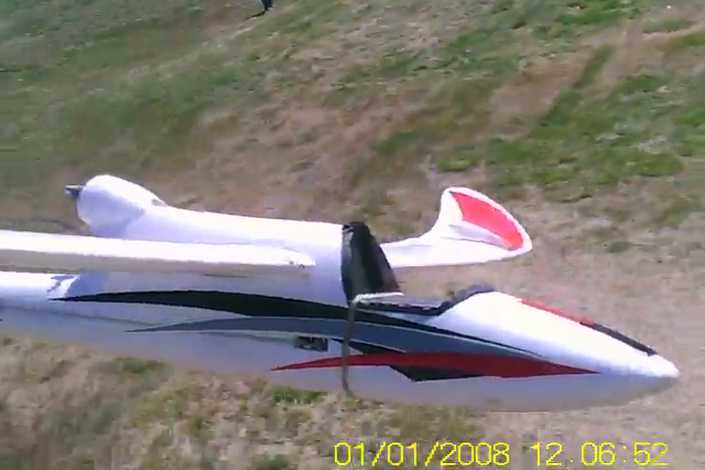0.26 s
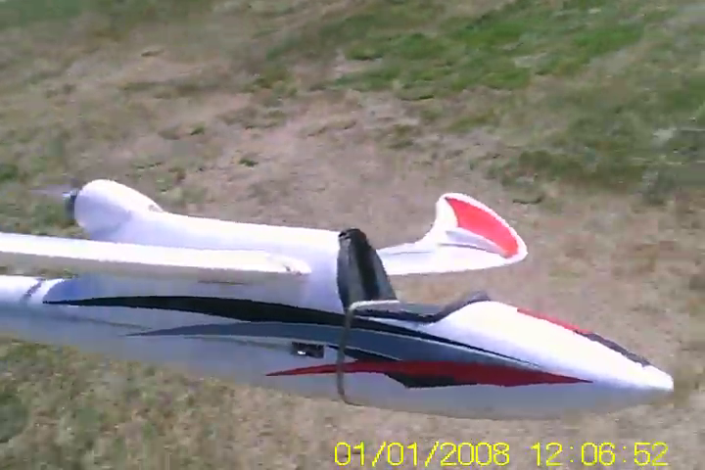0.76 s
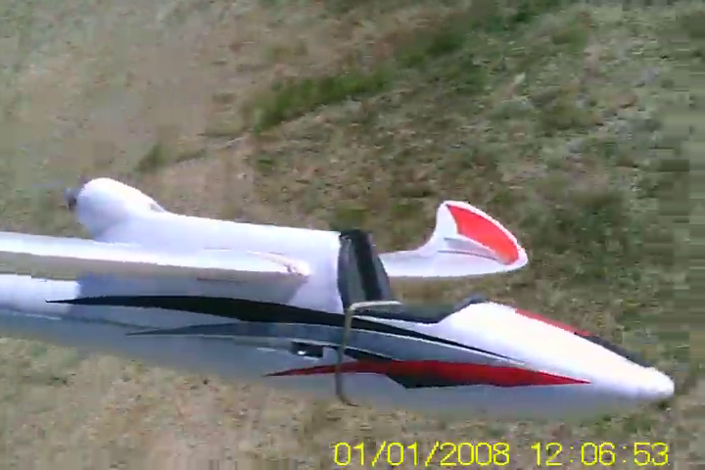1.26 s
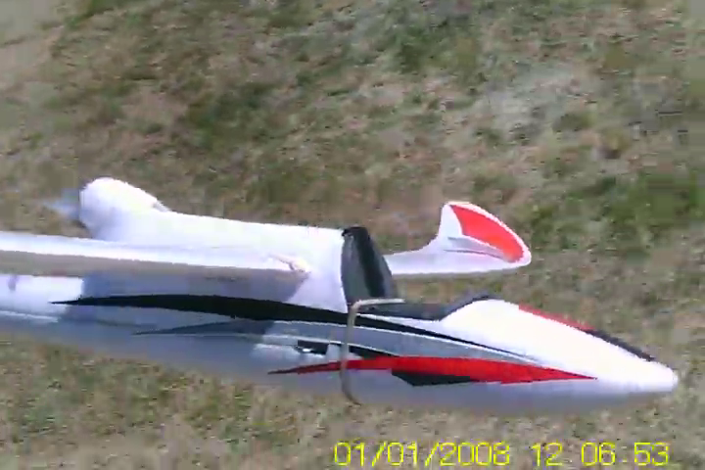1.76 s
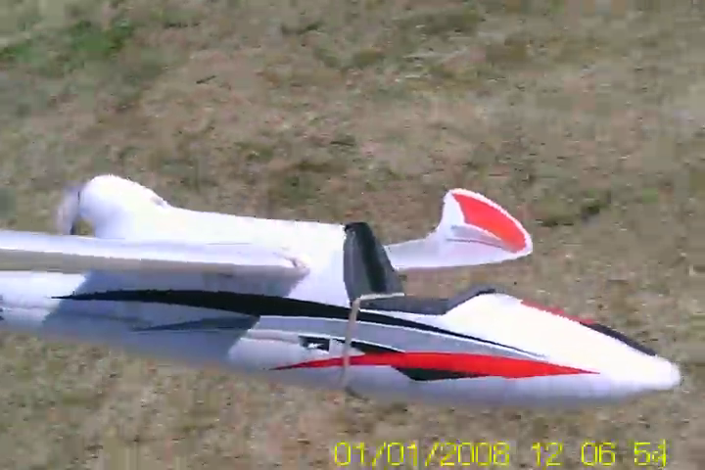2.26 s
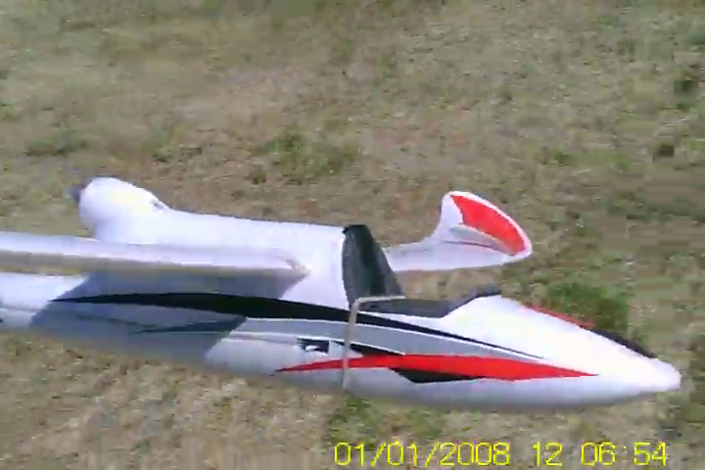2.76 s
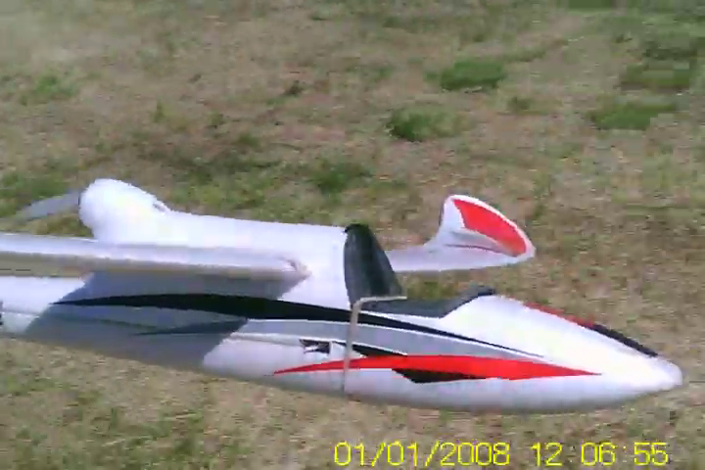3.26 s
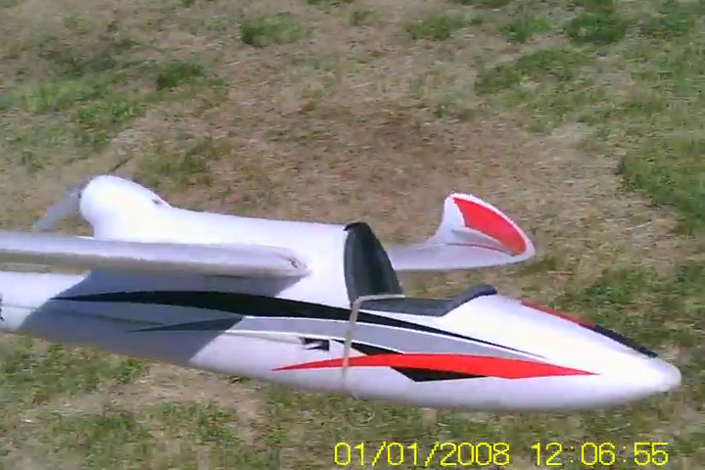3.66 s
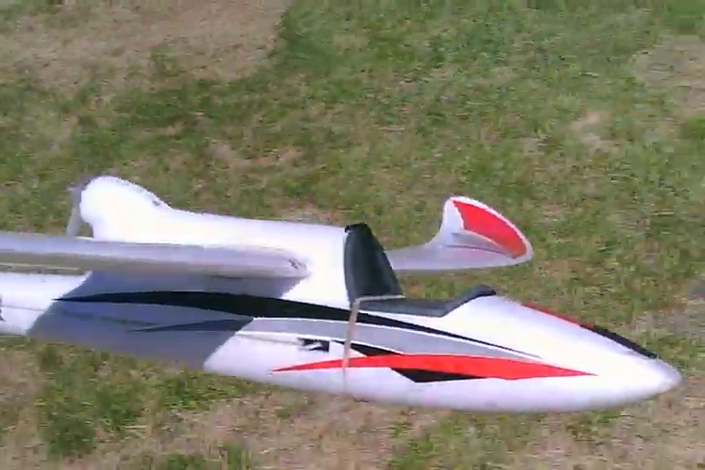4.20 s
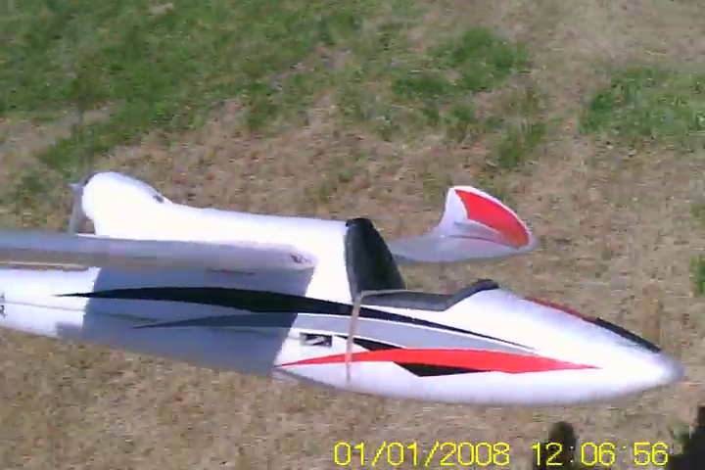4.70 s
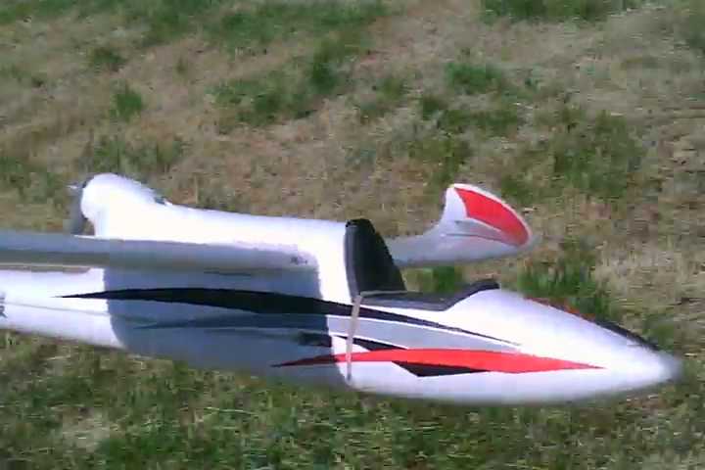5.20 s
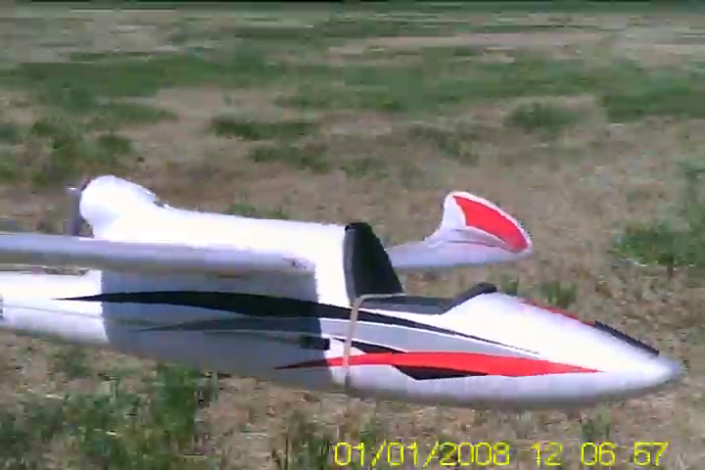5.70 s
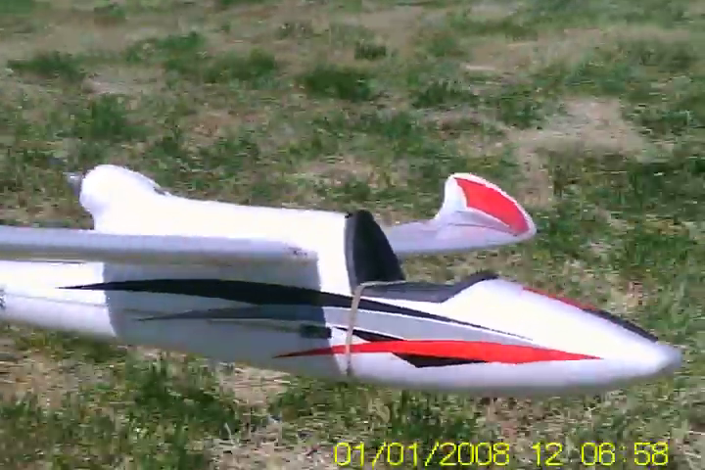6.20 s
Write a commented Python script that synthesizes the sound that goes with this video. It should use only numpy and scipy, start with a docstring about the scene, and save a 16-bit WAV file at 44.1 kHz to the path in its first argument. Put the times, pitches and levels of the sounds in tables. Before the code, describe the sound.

A model plane's electric motor whines close to an onboard microphone, half buried in low, gusty wind noise, while the mount buzzes and clicks. A single sharp, low thump comes early. Soon the motor winds down in a long falling whine, leaving fluttering air and a light crackle during the glide, until it spins up again with a short rasp.

```python
"""Turbulent air buffets the microphone of a small camera on the wing of a foam model plane, low over a field.
The electric pusher motor whines by magnetic cogging, and its unbalance rattles the mount once a turn.
One hard gust thumps the wing. The throttle closes, the whine falls through the airframe's resonances,
the plane glides with a faint dry crackle, and the motor starts again with a rasp."""
import sys
import numpy as np
from scipy import signal
from scipy.fft import rfft, irfft, next_fast_len
from scipy.io import wavfile
from scipy.ndimage import uniform_filter1d, map_coordinates

SR = 44100
rng = np.random.default_rng(int(sys.argv[2]) if len(sys.argv) > 2 else 0)


def inscribe(sig):
    """Save sig as 16-bit PCM at rate SR to the path in sys.argv[1].

    A 1-D sig is mono; a 2-D sig holds one channel per row.
    Samples are clipped to [-1, 1] before scaling.
    """
    pcm = np.round(np.clip(np.atleast_2d(sig).T, -1, 1) * 32767)
    wavfile.write(sys.argv[1], SR, pcm.astype(np.int16))


N = 284445

# bursts of buzzing: mostly camera vibration on the mount, but the 1.92-2.2 s row is the speed controller's
# freewheeling hiss as the motor winds down: (start [s], end [s], tap level [dB], fizz level [dB])
BURSTS = [(.08, .155, -70, -48.5), (0.201, 0.31, -57, -46), (0.328, 0.465, -52.5, -46),
          (0.472, .57, -50, -45), (.585, .64, -67, -52.5), (0.637, .775, -51, -47.5),
          (.8, 0.842, -66, -50.5), (0.877, 0.983, -62, -54), (0.998, 1.07, -59, -55),
          (1.16, 1.223, -62, -63), (1.28, 1.444, -62, -51.5), (1.488, 1.607, -64, -53),
          (1.664, 1.75, -61, -55), (1.92, 2.2, -78, -54), (6.365, 6.4, -66, -57)]
# the motor's run-up after the glide: (time [s], shaft speed [turns/s])
RESTART = [(6.21, 8), (6.223, 22), (6.255, 53), (6.315, 87.5), (6.34, 108), (6.38, 149.5), (6.4, 165),
           (6.45, 186)]


def amp(db):
    """Amplitude ratio of a level in decibels."""
    return 10 ** (np.asarray(db) / 20)


def unit(x):
    """Normalisation to rms 1."""
    return x / np.sqrt(np.mean(x ** 2) + 1e-20)


def curves(rows):
    """Linear interpolation in time: one value per sample for each column after the first."""
    times, *columns = np.transpose(rows)
    return [np.interp(np.arange(N) / SR, times, column) for column in columns]


def wobble(rate):
    """Smooth random modulation: a spline through `rate` Gaussian knots a second."""
    knots = rng.standard_normal(int(N * rate / SR) + 4)
    return map_coordinates(knots, [np.arange(N) * rate / SR])


def swells(rows):
    """Superposed Gaussian envelopes from (time [s], half-width [s], height) rows."""
    t = np.arange(N) / SR
    return sum(height * np.exp(-((t - at) / width) ** 2) for at, width, height in rows)


def gate(start, end, ramp_s=0.019):
    """A trapezoidal window, open from start to end."""
    t = np.arange(N) / SR
    return np.clip(np.minimum(t - start, end - t) / ramp_s + .5, 0, 1)


def filtered(x, response):
    """Linear filtering: the spectrum of x times a frequency response."""
    size = next_fast_len(N + SR // 2)
    return irfft(rfft(x, size) * response(np.fft.rfftfreq(size, 1 / SR)), size)[:N]


def coloured(x, spectrum):
    """Spectral shaping by (frequency [Hz], gain [dB]) points on a log axis, at rms 1."""
    points_hz, db = np.transpose(spectrum)
    return unit(filtered(x, lambda hz: amp(np.interp(np.log(hz + 1), np.log(points_hz), db))))


def noise(spectrum):
    """Gaussian noise of rms 1 with the given spectral shape."""
    return coloured(rng.standard_normal(N), spectrum)


def ring(blows, modes):
    """Modal response: blows convolved with a sum of damped sinusoids of peak 1."""
    t = np.arange(SR // 20) / SR
    response = sum(amp(db - 60 * t / t60) * np.sin(2 * np.pi * hz * t) for hz, db, t60 in modes)
    return signal.fftconvolve(blows, response / np.abs(response).max())[:N]


def shaft_speed():
    """Turns per second: cruise, a coast under quadratic drag and friction to windmilling, then restart."""
    # cruise and the closing of the throttle: (time [s], shaft speed [turns/s])
    cruise = [(0, 164), (.05, 188), (.12, 198), (.35, 209), (.7, 213), (1.3, 197.8), (1.74, 198),
              (1.9, 175), (2.05, 108), (2.17, 78)]
    coast_start_s, braking_per_s = 2.3, .6
    coast_speed, knee_speed, windmill_speed = 60.3, 32, 8  # turns/s; drag equals friction at the knee
    times = np.linspace(coast_start_s, RESTART[0][0], num=200, endpoint=False)
    slowing = np.arctan(coast_speed / knee_speed) - braking_per_s * (times - coast_start_s)
    coast = np.maximum(knee_speed * np.tan(slowing), windmill_speed)
    return curves(np.vstack([cruise, np.column_stack([times, coast]), RESTART]))[0]


def wind(speed, turns):
    """Turbulent pressure at the microphone port: noise bands modulated by eddies and shaft rotation."""
    # airflow, easing into the glide: (time [s], buffet level [dB], rush level [dB], hiss level [dB])
    airflow = [(0, -22.5, -35, -49.5), (.25, -19.5, -31.5, -41), (.52, -18.5, -28, -35),
               (.765, -18.5, -30, -40.5), (.79, -18, -39, -47), (.92, -25, -32.5, -41.5),
               (1.15, -23.5, -37.5, -45), (1.4, -25, -34, -42), (1.8, -24.5, -34.5, -44),
               (2.02, -24.5, -32.5, -41), (2.3, -23.5, -36, -46), (2.7, -23, -35.5, -50.5),
               (3.28, -22.5, -38, -53), (3.65, -26.5, -40.5, -55.5), (4.4, -24.5, -39.5, -57.5),
               (4.88, -26, -40.5, -58.5), (6.15, -23.5, -40.5, -64.5), (6.45, -28.5, -39.5, -46)]
    # four bands of the airflow, low to high: (frequency [Hz], relative spectral density [dB])
    buffet_spectrum = [(8, -3), (25, 0.5), (55, 0), (100, -3.5), (170, -9.5), (280, -15.5), (450, -21.5),
                       (900, -33.5), (2000, -70.5)]
    rush_spectrum = [(150, -28), (350, 4.5), (550, 2), (900, 0), (1300, -1), (1700, -1), (2050, -4),
                     (2350, -16), (2900, -26.5), (5000, -60)]
    hiss_spectrum = [(900, -5), (1700, 1.5), (2450, 6.5), (2800, 0.5), (3200, -0.5), (3700, -5),
                     (4200, -6.5), (4600, -4), (5200, -17.5), (7000, -35), (10000, -38)]
    fizz_spectrum = [(3000, -3), (5000, -3), (5900, -1.5), (6600, -4), (7200, -3), (7800, -12),
                     (8600, -25.5), (9700, -10), (10400, -18.5), (11600, -21.5)]
    # brief gusts that brighten the airflow: (time [s], half-width [s], rise of the hiss [dB])
    gusts = [(2.7, 0.047, 5.5), (3.81, .035, 7), (3.92, .02, 6), (4.03, 0.06, 9), (4.595, 0.014, 9.5),
             (4.71, 0.069, 6), (5.25, 0.016, 2), (5.77, 0.022, 7.5)]
    # large eddies that thump the port: (time [s], half-width [s], level [dB])
    large_eddies = [(.75, 0.039, -18.5), (2.25, .12, -29.5), (2.72, 0.063, -30), (3.271, 0.056, -29.5),
                    (4.519, 0.045, -34.5), (5.24, 0.047, -28.5), (6.12, 0.076, -30.5)]
    # their spectrum: (frequency [Hz], relative spectral density [dB])
    thump_spectrum = [(20, -5), (60, 3), (170, 2.5), (300, -6.5), (450, -10.5), (900, -51), (3000, -120)]
    buffet_db, rush_db, hiss_db = curves(airflow)
    gust_db = swells(gusts)
    eddies, flutter = wobble(28), wobble(170)
    relative_speed = speed / speed.max()
    chop = relative_speed * np.cos(2 * np.pi * turns)  # the treble is chopped once a turn
    puffs = amp(db=6 * chop)
    puffs /= np.sqrt(uniform_filter1d(puffs ** 2, size=SR // 25))  # bunches the power without adding any
    # fizz from the airstream, the propeller wash, the buzzing mount and the controller's freewheeling hiss adds
    # in power
    stream = amp(-73 + 0.45 * (hiss_db - hiss_db.mean()) + gust_db)
    wash = amp(-58) * np.maximum(gate(start=0, end=2.22), relative_speed ** 2)
    buzz = sum(amp(db) * gate(start, end) for start, end, _, db in BURSTS)
    fizz_level = np.sqrt(stream ** 2 + wash ** 2 + buzz ** 2)
    buffet = amp(buffet_db) * noise(buffet_spectrum)
    rush = amp(rush_db + 0.53 * gust_db) * unit(noise(rush_spectrum) * amp(0.6 * eddies + 0.92 * flutter))
    hiss_flicker = amp(0.98 * eddies + 1.2 * flutter + 0.89 * chop)
    hiss = amp(hiss_db + gust_db) * unit(noise(hiss_spectrum) * hiss_flicker)
    fizz = fizz_level * unit(noise(fizz_spectrum) * amp(0.46 * eddies + 1.5 * flutter) * puffs)
    thumps = swells([(at, width, amp(db)) for at, width, db in large_eddies]) * noise(thump_spectrum)
    return buffet + thumps + rush + hiss + fizz


def airframe(hz):
    """Transfer gain of the airframe: resonances summed in power, notched by one antiresonance."""
    # structural resonances: (frequency [Hz], bandwidth [Hz], peak gain [dB])
    resonances = [(590, 70, -15), (712, 45, -6), (970, 70, -7), (1050, 80, 3.5), (1310, 150, -5.5),
                  (1650, 80, -6), (1950, 90, -14), (2110, 110, -11), (2280, 90, -17), (2560, 160, -18),
                  (2980, 250, -23), (4650, 700, -16), (7100, 900, -29)]
    notch_hz, notch_half_width_hz, notch_db = 1135, 49, -13
    notch = amp(notch_db * np.exp(-((hz - notch_hz) / notch_half_width_hz) ** 2))
    power = sum(amp(db) ** 2 / (1 + (2 * (hz - centre) / width) ** 2) for centre, width, db in resonances)
    return notch * np.sqrt(power)


def motor(speed, turns):
    """Forced vibration: cogging tones flare at airframe resonances; propeller tones grow as speed cubed."""
    # how hard the cogging shakes the pylon: (shaft speed [turns/s], level [dB])
    drive = [(8, -70), (13, -38), (19, -26.5), (58, -26.5), (68, -34), (95, -33), (125, -30), (150, -38),
             (185, -36), (210, -41)]
    # cogging of nine slots against twelve magnets: (order [cycles/turn], relative level [dB])
    cogging = [(27, -8), (36, 0), (72, -9), (81, -6), (99, -10), (108, -4.5), (110, -7)]
    # propeller and unbalance tones: (order [cycles/turn], level at full speed [dB])
    propeller = [(2, -42), (4, -51), (9, -51.5), (10, -48), (11, -55), (12, -58)]
    slots, bell_hz, full_load_acceleration = 9, 2400, 300  # acceleration in turns/s^2
    load = np.clip(np.gradient(speed) * SR / full_load_acceleration, 0, 1)
    load_db = load * (.7 + 3 * wobble(200))  # under load the whine grows and turns ragged
    whine_db = np.interp(speed, *np.transpose(drive)) + load_db
    eccentricity = 1 + 0.31 * np.sin(2 * np.pi * turns)  # the rotor is slightly off centre
    angle = turns + 0.00047 * wobble(66)  # uneven rotation roughens the overtones most
    tones = amp(-38) * load * airframe(slots * speed) * np.sin(2 * np.pi * slots * angle)
    for order, db in cogging:
        hz = order * speed
        is_overtone = order > 36
        flutter_db = 4 if is_overtone else 2.2
        # overtones carry only near the ring of the motor bell
        bell = 1 / (1 + is_overtone * (np.log(hz / bell_hz) / .3) ** 4)
        level = amp(whine_db + db + flutter_db * wobble(30)) * eccentricity * airframe(hz) * bell
        tones += level * np.sin(2 * np.pi * order * angle)
    for order, db in propeller:
        level = amp(db + 2.2 * wobble(8)) * (speed / speed.max()) ** 3
        tones += level * np.sin(2 * np.pi * order * turns + 0.45 * wobble(22))
    return tones


def controller(turns):
    """The speed controller whistles at its switching rate; its start-up kicks excite the pylon's modes."""
    # switching whistle: (time [s], level [dB])
    whistle_levels = [(0, -57), (.8, -66), (1.88, -65), (1.96, -110), (6.13, -110), (6.165, -68),
                      (6.23, -62), (6.45, -56.5)]
    # modes of the motor pylon: (frequency [Hz], relative level [dB], 60 dB decay time [s])
    pylon_modes = [(1000, -7, 0.024), (1620, -5, 0.019), (2330, -3.5, 0.015), (4700, -10, .012)]
    # surges of rasp as the motor pulls up: (time [s], half-width [s], level [dB])
    surges = [(6.235, 0.02, -39), (6.28, 0.027, -40), (6.39, .012, -52), (6.44, 0.028, -43.5)]
    switching_hz, kicks_per_turn, cutoff_hz = 8011, 12, 5600
    t = np.arange(N) / SR
    whistle = amp(curves(whistle_levels)[0] + .6 * wobble(37)) * np.sin(2 * np.pi * switching_hz * t)
    kicks = np.diff(np.floor(kicks_per_turn * turns), prepend=0) * rng.standard_normal(N)
    strain = swells([(at, width, amp(db)) for at, width, db in surges])
    # the soft mount dulls the kicks
    rasp = filtered(ring(kicks, pylon_modes), lambda hz: 1 / (1 + (hz / cutoff_hz) ** 12))
    return whistle + strain * rasp / rasp[t > RESTART[0][0]].std()


def mount_rattle(turns):
    """Impacts ring the camera case: bursts of once-a-turn taps from unbalance, and knocks from jolts."""
    # modes of the case: (frequency [Hz], relative level [dB], 60 dB decay time [s])
    case_modes = [(2420, 9.5, .005), (4570, 3.5, .008), (5600, -0.5, 0.0022), (6160, -3, .003),
                  (7100, -3, .004), (9480, -2.5, 0.0061)]
    # single knocks of the mount: (time [s], peak level [dB])
    knocks = [(0.1146, -36.5), (0.2078, -30), (0.336, -28.5), (0.7646, -26), (0.7684, -24), (0.7752, -32),
              (0.8066, -26), (1.746, -36), (4.656, -42.5), (6.3154, -40), (6.368, -40), (6.3834, -33)]
    once_a_turn = np.diff(np.floor(turns), prepend=0)
    taps = once_a_turn * amp(3.3 * rng.standard_normal(N) + 2.3 * wobble(25))
    tap_level = sum(amp(db) * gate(start, end) for start, end, db, _ in BURSTS)
    blows = np.zeros(N)
    for at, db in knocks:
        blows[round(at * SR)] = amp(db)
    return tap_level * unit(ring(taps, case_modes)) + ring(blows, case_modes)


def wing_slap(at_s=0.91, half_width_s=0.0023, push_hz=150, peak_db=-5):
    """A pressure pulse from one hard eddy on the wing: a short low push with a rebound."""
    t = np.arange(N) / SR - at_s
    return -amp(peak_db) * np.exp(-(t / half_width_s) ** 2) * np.cos(2 * np.pi * push_hz * t)


def crackle(ticks_per_s=260):
    """Shot noise: small dry ticks at random instants ride on the airflow."""
    # swells of crackle in the glide: (time [s], half-width [s], level [dB])
    patches = [(2.85, .35, -64.5), (4.45, 0.13, -65), (5.65, 0.6, -63.5)]
    # spectrum of a tick: (frequency [Hz], relative level [dB])
    spectrum = [(500, -13.5), (2000, -17), (3800, 5), (4800, 0.5), (5800, -10.5), (7000, -24),
                (11000, -28.5)]
    ticks = (rng.random(N) < ticks_per_s / SR) * amp(3 * rng.standard_normal(N))
    level = swells([(at, width, amp(db)) for at, width, db in patches])
    return level * coloured(ticks, spectrum)


def scene():
    """Superposition of wind, motor and rattle, all within a wing's length of the microphone."""
    speed = shaft_speed()
    turns = np.cumsum(speed) / SR
    mix = wind(speed, turns) + motor(speed, turns) + controller(turns) + mount_rattle(turns)
    return (mix + wing_slap() + crackle())[None]


def record(dry):
    """Self-noise and band limiting: the camera adds faint hiss and whistles and cuts the top treble."""
    # whistles of the camera's electronics: (frequency [Hz], level [dB])
    whistles = [(5649, -80.5), (7410, -81), (9600, -84.5)]
    rolloff_hz, band_limit_hz = 10200, 11655
    floor = amp(-76.5) * noise([(100, 1.5), (5000, 2), (9700, -2), (11600, 0.5)])
    floor += sum(amp(db) * np.sin(2 * np.pi * hz * np.arange(N) / SR) for hz, db in whistles)
    dull = filtered(dry[0] + floor, lambda hz: 1 / np.sqrt(1 + (hz / rolloff_hz) ** 28))
    return filtered(dull, lambda hz: hz < band_limit_hz)[None]


dry = scene()
out = record(dry)
inscribe(out)
```